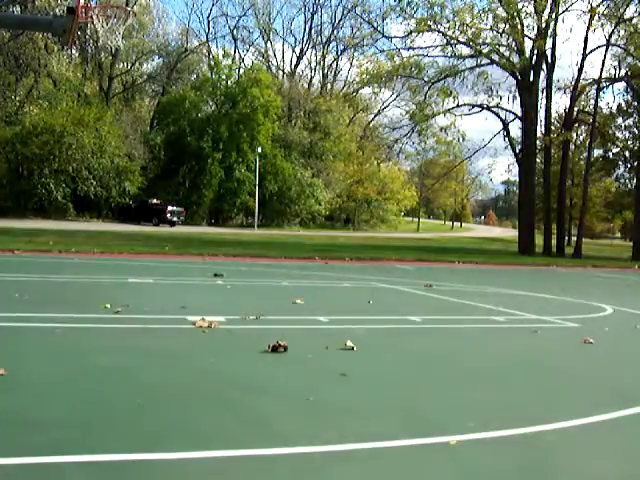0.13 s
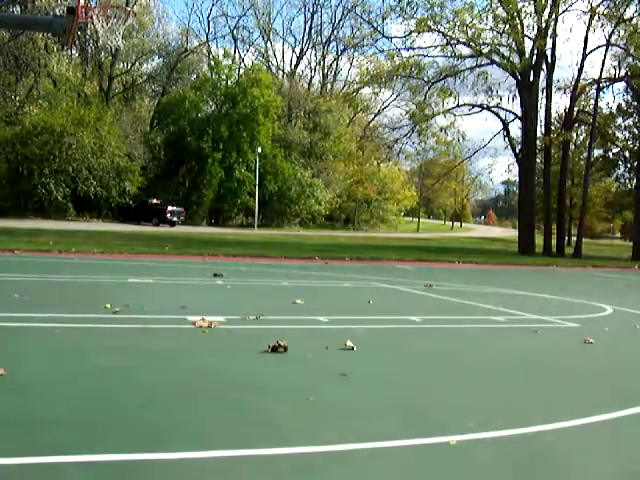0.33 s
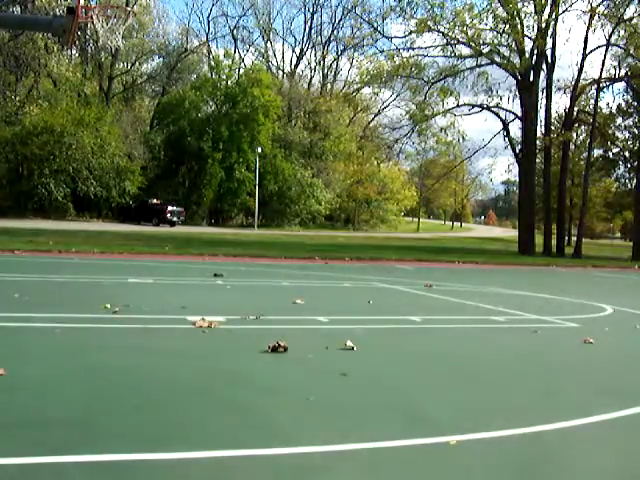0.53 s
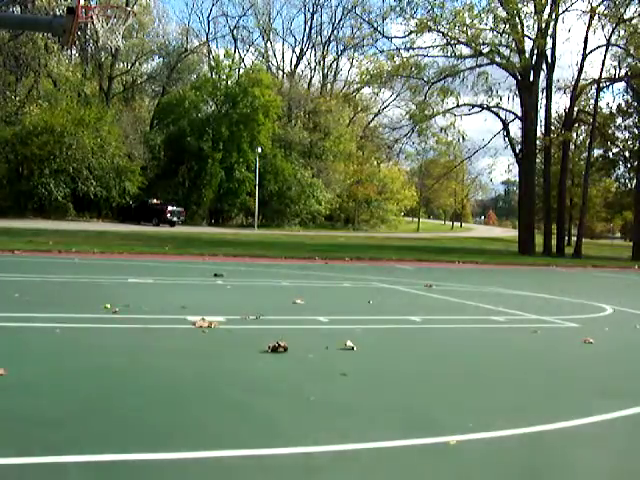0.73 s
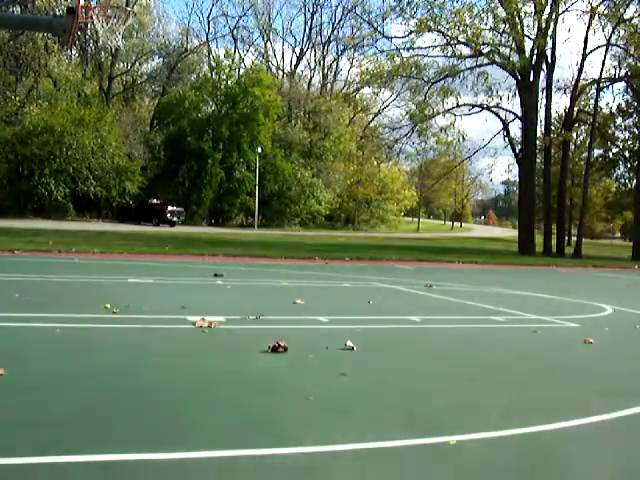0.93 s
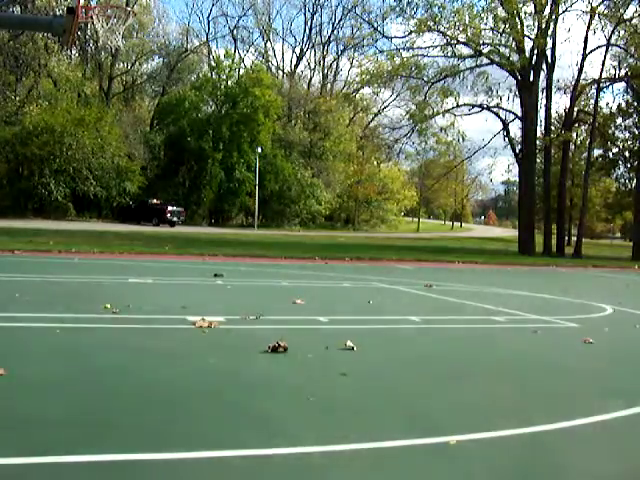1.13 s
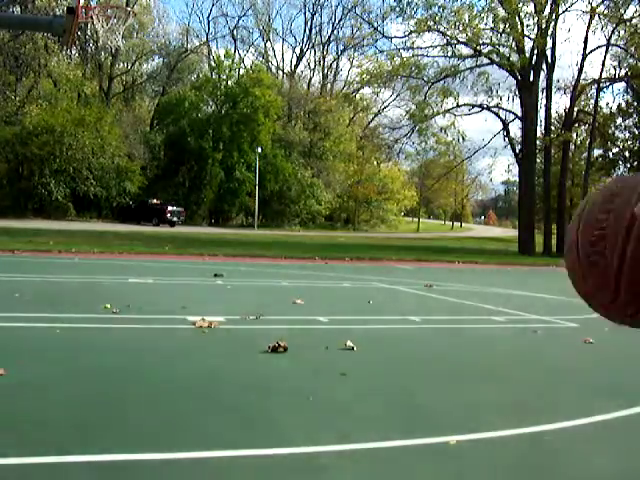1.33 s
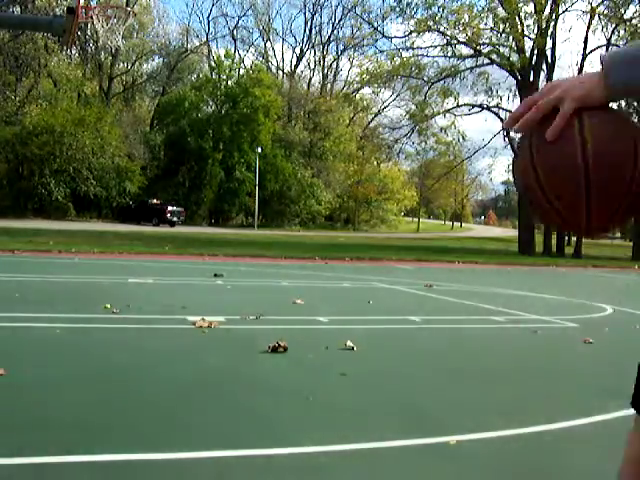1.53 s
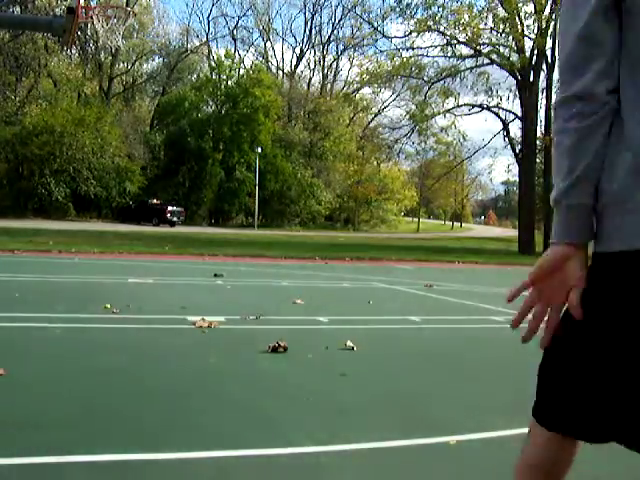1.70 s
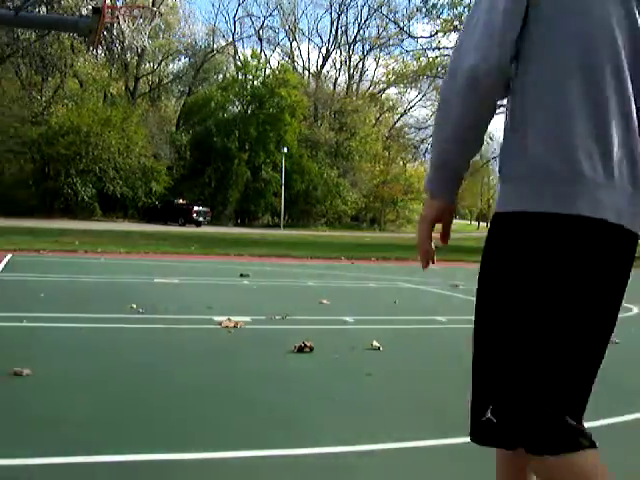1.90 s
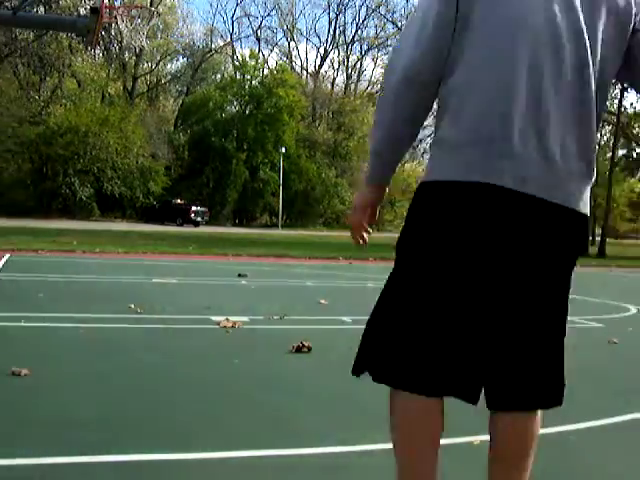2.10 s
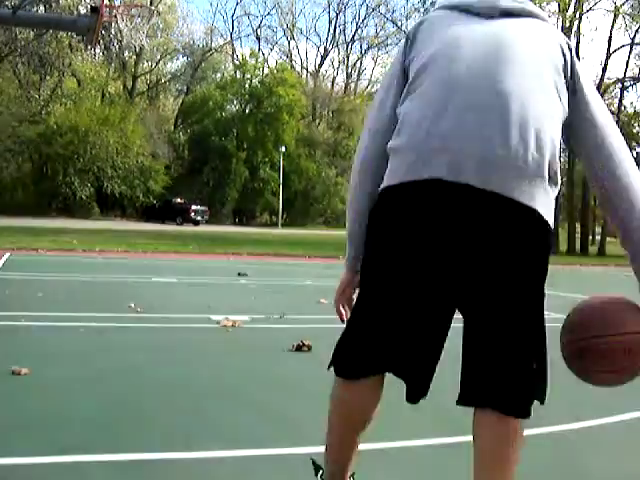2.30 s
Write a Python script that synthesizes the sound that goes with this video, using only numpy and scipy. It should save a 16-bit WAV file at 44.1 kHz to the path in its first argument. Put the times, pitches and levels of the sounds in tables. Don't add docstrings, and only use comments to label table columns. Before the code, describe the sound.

A basketball is dribbled close to the microphone on a hard outdoor court: two hard, punchy bounces, then a softer one, each with a thin ringing tail, over quiet park hiss, low traffic rumble and faint scuffs.

```python
import sys
import numpy as np
from scipy import signal
from scipy.io import wavfile

SR = 44100
rng = np.random.default_rng(int(sys.argv[2]) if len(sys.argv) > 2 else 0)


def persist_wave(psi):
    counts = np.round(np.clip(psi, -1, 1) * 32767).astype(np.int16)
    wavfile.write(sys.argv[1], SR, np.atleast_2d(counts).T)


def how_loud(loudness_db):
    steps = np.asarray(loudness_db, float) / 20
    return 10 ** steps


N = 103635


def drift(rate_hz):
    pole = np.exp(-80 * np.pi * rate_hz / SR)
    noise = rng.standard_normal(N // 40 + 2002)
    slow = signal.lfilter([1], [1, -2 * pole, pole * pole], noise)[2000:]
    return np.interp(np.arange(N) / 40, np.arange(len(slow)), slow / slow.std())


def banded(spectrum, patchy_db):
    hz, db = np.transpose(spectrum)
    white, shared = rng.standard_normal((2, N + 4000)), drift(1.96)
    edges = np.geomspace(hz[0], hz[-1], int(5 * np.log2(hz[-1] / hz[0])) + 2)
    out = 0
    for k, (low, high) in enumerate(zip(edges, edges[1:])):
        sos = signal.butter(2, [low, high], "band", fs=SR, output="sos")
        band = signal.sosfilt(sos, white[k % 2])[4000:]
        level_db = np.interp(np.log(low * high) / 2, np.log(hz), db)
        flicker_db = patchy_db * (1.2 * shared + drift(10.8))
        out = out + band * how_loud(level_db + flicker_db)
    return out / out.std()


def since(start_s):
    t = np.arange(N) / SR - start_s
    return np.maximum(t, 0), t >= 0


def modes(start_s, table, spread_db):
    t, on = since(start_s)
    luck = rng.standard_normal(len(table))
    out = 0
    for (hz, db, t60), chance in zip(table, luck):
        out = out + how_loud(db + spread_db * chance - 60 * t / t60) * np.sin(2 * np.pi * hz * t)
    return -out * on


# time_s, level_db
PARK_LEVEL = [(0, -46), (.235, -47.5), (.255, -55.5), (.5, -54), (1.0, -53), (1.14, -50.5), (1.16, -58),
              (1.5, -58), (1.75, -57), (1.77, -56.5), (2.1, -57), (2.35, -55)]
# frequency_hz, density_db (per Hz)
PARK_HISS = [(120, -17), (180, -6.5), (700, -13), (2900, -22), (7300, -31), (8000, -43.5), (8700, -30),
             (10500, -37)]
# frequency_hz, density_db (per Hz)
TRAFFIC_RUMBLE = [(12, -3), (20, -2), (70, -4.5), (92, -6.5), (113, -12), (135, -15), (250, -24),
                  (320, -63), (550, -120)]
# frequency_hz, level_db
WHINES = [(7498, -25), (8502, -31)]


def park():
    t = np.arange(N) / SR
    whine = 0
    for hz, db in WHINES:
        whine = whine + how_loud(db + 2 * drift(8)) * np.sin(2 * np.pi * hz * t)
    hiss = banded(PARK_HISS, patchy_db=0)
    rumble = how_loud(10.5) * banded(TRAFFIC_RUMBLE, patchy_db=3.5)
    return how_loud(np.interp(t, *np.transpose(PARK_LEVEL))) * (hiss + rumble + whine)


SCUFF_STARTS = [.002, .395, .5, 1.01, 1.195, 1.3955, 1.4035, 1.402, 1.62, 1.619, 1.666, 1.683, 1.681, 2.09,
                2.14]
# level_db, length_s, centre_hz
SCUFF_SOUNDS = [(-44.5, 0.012, 2720), (-65, 0.016, 7800), (-67, 0.079, 5000), (-61.5, 0.017, 6800),
                (-64, 0.027, 710), (-56, 0.0055, 1100), (-49.5, 0.0059, 1950), (-53, 0.013, 235),
                (-55.5, 0.026, 350), (-62, 0.0072, 2500), (-57, 0.026, 740), (-56, 0.019, 1500),
                (-63, 0.016, 4500), (-66.5, 0.052, 3900), (-65, .06, 2750)]


def scuffs():
    grains_per_s = 6000
    hits = rng.random(N) < grains_per_s / SR
    strength = how_loud(3.6 * np.minimum(rng.exponential(1, N), 4))
    grains = hits * strength * rng.choice([-1, 1], N)
    grains = grains / grains.std()
    out = 0
    for start_s, (db, length_s, hz) in zip(SCUFF_STARTS, SCUFF_SOUNDS):
        t, on = since(start_s)
        sos = signal.butter(2, [hz / 1.9, min(hz * 1.6, 12000)], "band", fs=SR, output="sos")
        shaped = signal.sosfilt(sos, grains)
        age = t / length_s * 4
        out = out + how_loud(db + 9.5) * shaped / shaped.std() * on * age ** 2 * np.exp(-age)
    return out


def thump(start_s, db, soft, lift_s):
    t, on = since(start_s)
    flight = since(lift_s + 0.0068)[0]
    sag_s = 0.0027
    turns = 81.5 * t + soft * 41.3 * sag_s * (1 - np.exp(-t / sag_s)) + 0.1 - 0.09 * soft
    swing_db = 9.8 * soft - 60 * t / 0.075 - 60 * flight / 0.031 * 0.71
    swing = how_loud(swing_db) * np.cos(2 * np.pi * turns)
    squash_db = -9 + 17 * soft - 60 * t / (0.031 + 0.024 * soft)
    squash = how_loud(squash_db) * np.cos(2 * np.pi * (180.6 * t + 0.44 * soft))
    rise = 1 - np.exp(-(t / (0.00008 + soft * 0.0029)) ** 2)
    return -how_loud(db) * on * rise * (swing + squash)


# frequency_hz, level_db, t60_s
SKIN_MODES = [(410, -6, 0.04), (577, -12, 0.027), (2300, 0.5, 0.0064), (2960, -9, 0.009), (4340, 8, 0.0022),
              (6140, 0, 0.0027)]


def slap(start_s, soft):
    return 0.34 * modes(start_s, SKIN_MODES, spread_db=5) * how_loud(-5 * soft)


# frequency_hz, density_db (per Hz)
PUFF_SPECTRUM = [(1800, -6), (2500, -7.5), (4500, -12.5), (7000, -17), (9500, -27)]


def puff(start_s, soft):
    t, on = since(start_s)
    envelope = how_loud(-15.5 - 60 * t / 0.0055) + how_loud(-31 - 60 * t / 0.06)
    return 2 * how_loud(-6 * soft) * banded(PUFF_SPECTRUM, patchy_db=0) * on * envelope


# frequency_hz, density_db (per Hz)
RATTLE_SPECTRUM = [(250, -5), (500, 0), (900, -2), (1400, -8.5), (2200, -28.5)]


def rattle(start_s, soft):
    t, _ = since(start_s)
    envelope = (1 - np.exp(-t / 0.0013)) * how_loud(-10 - 60 * t / 0.063)
    return how_loud(-2 * soft) * banded(RATTLE_SPECTRUM, patchy_db=0) * envelope


def glide(start_s, db, from_hz, fall_s):
    t, on = since(start_s)
    to_hz, t60_s = 563, 0.017
    turns = to_hz * t + (from_hz - to_hz) * fall_s * (1 - np.exp(-t / fall_s))
    return on * -how_loud(db - 60 * t / t60_s) * np.sin(2 * np.pi * turns)


# frequency_hz, level_db, t60_s
LIFT_MODES = [(320, 5.5, 0.051), (496, 1, 0.016), (713, 8.5, 0.012), (790, -8.5, 0.03), (900, -6.5, 0.049),
              (1066, -19, 0.023), (1254, -5.5, .035), (1590, -9, 0.016)]


def lift_off(start_s, db, ping_hz):
    t, _ = since(start_s)
    ping_s = 0.00077
    swell = t / ping_s * np.exp(1 - t / ping_s)
    ping = swell * np.sin(2 * np.pi * ping_hz * t)
    ring = (1 - np.exp(-t / ping_s)) * modes(start_s, LIFT_MODES, spread_db=3)
    return how_loud(db) * (ping + how_loud(-12) * ring)


# start_s, thump_db, softness (0-1), slap_db
TOUCHDOWNS = [
    (0.2416, -2.5, 0.01, -8),
    (1.1437, -4, 0.04, -8.5),
    (1.7524, -14.5, 0.96, -9),
]
# level_db, start_hz, fall_s
SKIN_WAVES = [(-16, 2340, 0.00173), (-10, 1870, 0.00304), (-25.5, 2054, 0.0042)]
# start_s, level_db, ping_hz
LIFT_OFFS = [(0.2548, -16.5, 930), (1.157, -27, 1158), (1.7657, -23, 1240)]


def ball():
    low, high = 0, 0
    for (start_s, db, soft, slap_db), wave, lift in zip(TOUCHDOWNS, SKIN_WAVES, LIFT_OFFS):
        low = low + thump(start_s, db, soft, lift[0])
        contact = slap(start_s, soft) + puff(start_s, soft) + rattle(start_s, soft)
        high = high + how_loud(slap_db) * contact + glide(start_s, *wave) + lift_off(*lift)
    lag = int(0.0465 * SR)
    late = np.r_[np.zeros(lag), high[:-lag]]
    echo = signal.sosfilt(signal.butter(2, 3500, fs=SR, output="sos"), late)
    return low + high + how_loud(-39) * echo


CAVITY_PITCHES = [2160, 2837, 3488, 4410]
# level_db, t60_s, beat_hz
CAVITY_MODES = [(-67, .8, 2.5), (-58, 4, .9), (-65, 2, 1.3), (-62, 1.2, 2.0)]
CAVITY_LEVELS = [-4, 0, -12]
SIDE_MODE_LEVELS = [-4.5, -4, 3]
PALM_CATCHES = [.5, 1.415, 1.85]


def cavity():
    strongest_hz = CAVITY_PITCHES[1]
    out = 0
    for bounce, db, side_db, catch_s in zip(TOUCHDOWNS, CAVITY_LEVELS, SIDE_MODE_LEVELS, PALM_CATCHES):
        t, on = since(bounce[0])
        shape = on * how_loud(db - 9 * since(catch_s)[1])
        flutter = 1 + how_loud(-60 * t / 0.5) * 2 * np.cos(2 * np.pi * 40 * t)
        for hz, (level_db, t60_s, beat_hz) in zip(CAVITY_PITCHES, CAVITY_MODES):
            beat = 0.15 + np.abs(np.sin(2 * np.pi * beat_hz * t)) ** 1.5
            mode_db = level_db + side_db * (hz != strongest_hz) - 60 * t / t60_s + 2.5 * drift(24)
            out = out + shape * beat * flutter * how_loud(mode_db) * np.sin(2 * np.pi * hz * t)
    return out


def scene():
    return (park() + scuffs() + ball() + cavity())[None]


def roll_off(x):
    return signal.sosfilt(signal.butter(12, 9780, fs=SR, output="sos"), x)


def record(dry):
    x = dry / (1 + np.abs(dry / 1.4) ** 6) ** (1 / 6)
    dip_hz, dip_width_hz = 7970, 540
    x = x - 0.98 * signal.lfilter(*signal.iirpeak(dip_hz, dip_hz / dip_width_hz, fs=SR), x)
    x = signal.sosfilt(signal.cheby2(12, 75, 10200, fs=SR, output="sos"), x)
    return roll_off(np.clip(x, -1, 1))


dry = scene()
out = record(dry)
persist_wave(out)
```